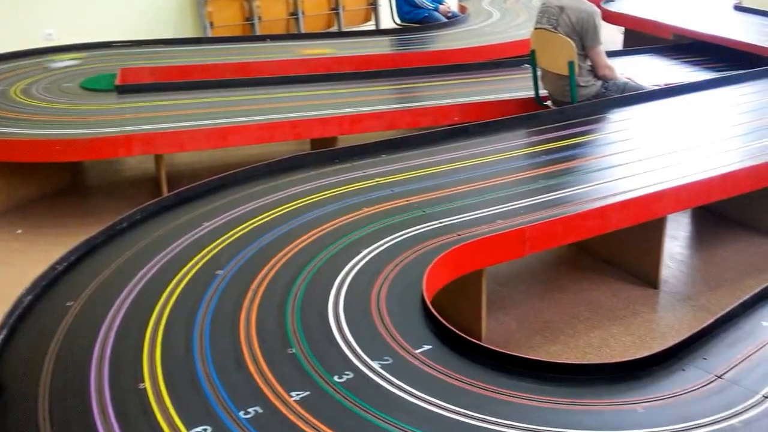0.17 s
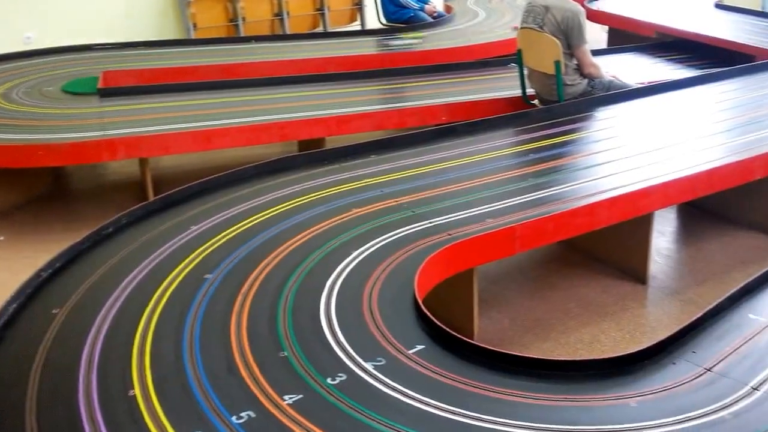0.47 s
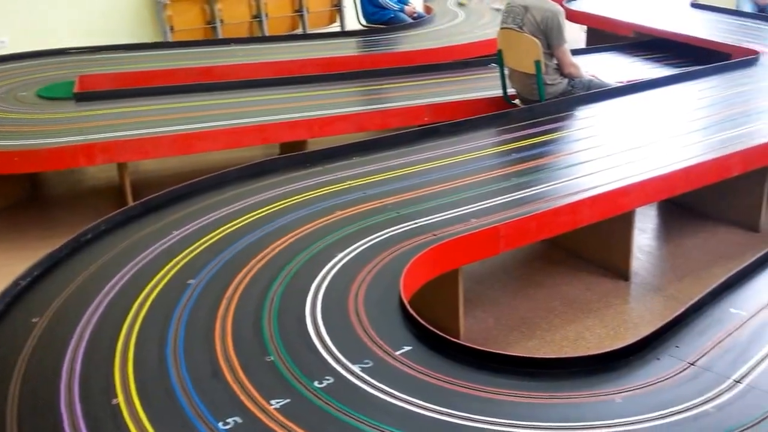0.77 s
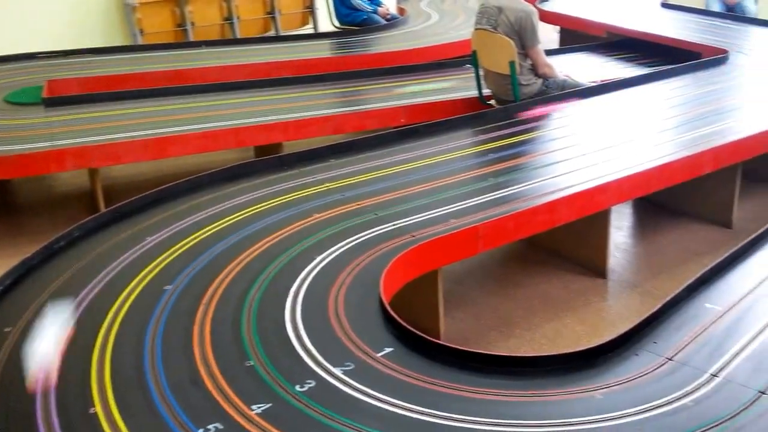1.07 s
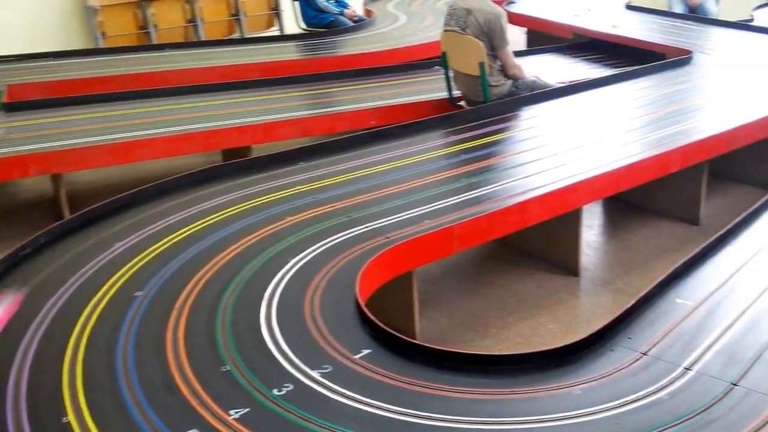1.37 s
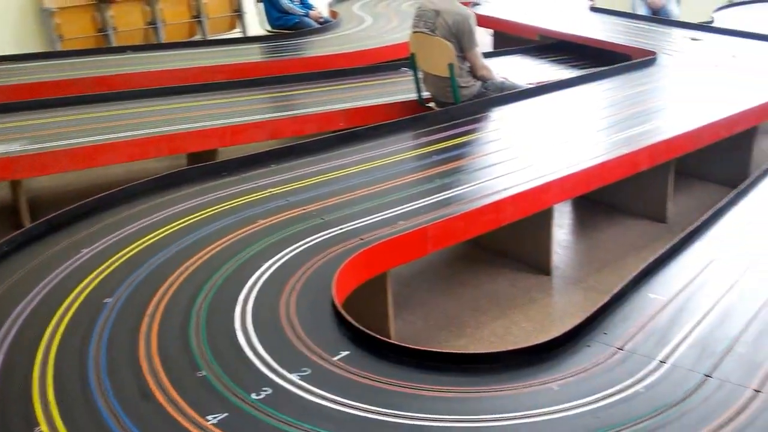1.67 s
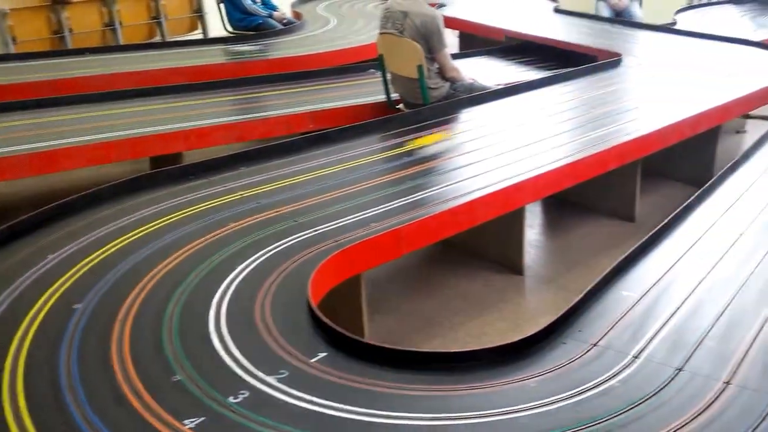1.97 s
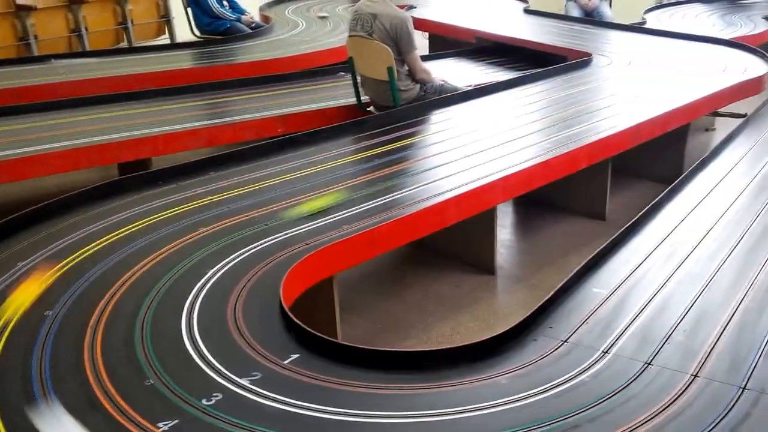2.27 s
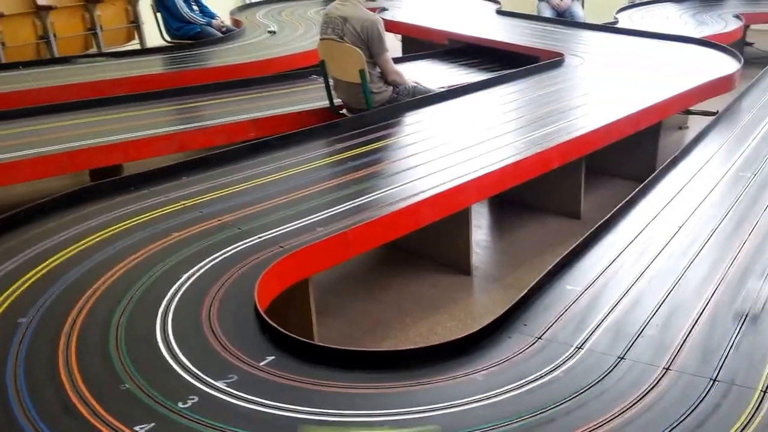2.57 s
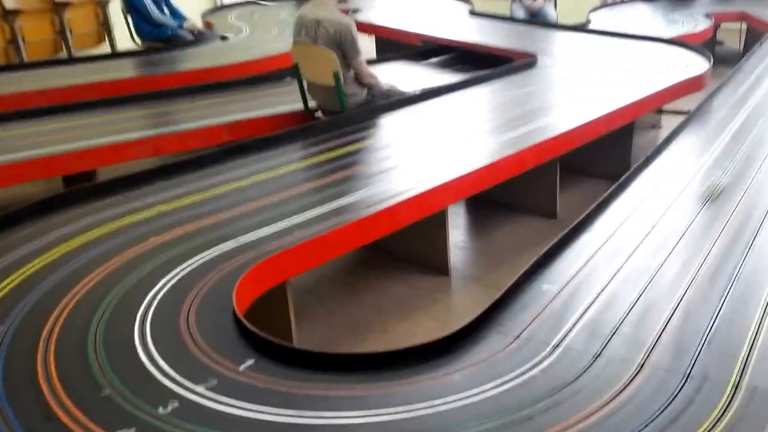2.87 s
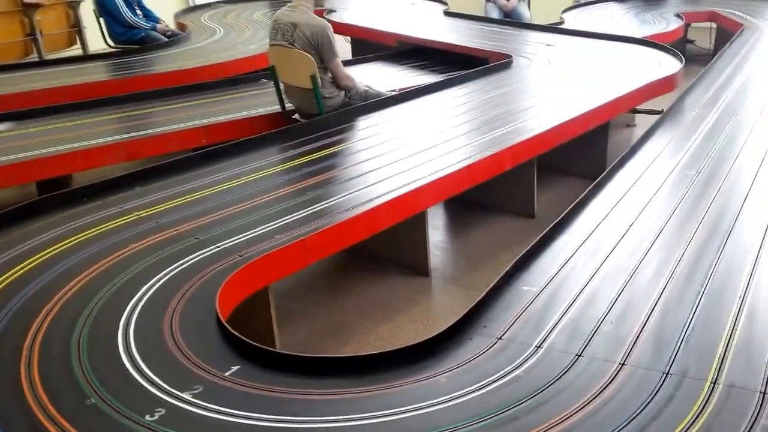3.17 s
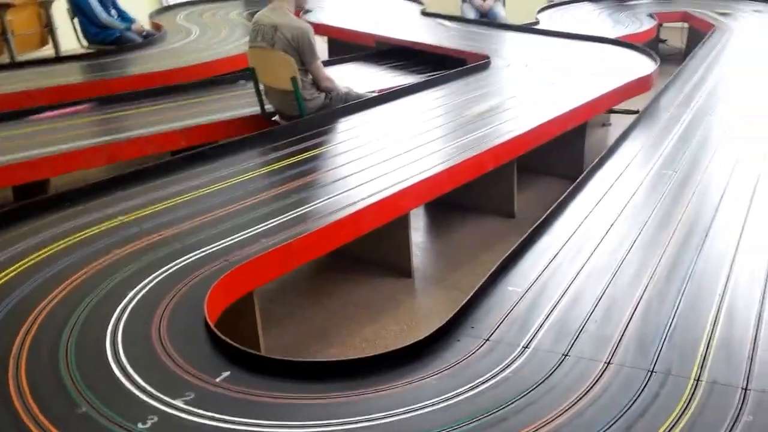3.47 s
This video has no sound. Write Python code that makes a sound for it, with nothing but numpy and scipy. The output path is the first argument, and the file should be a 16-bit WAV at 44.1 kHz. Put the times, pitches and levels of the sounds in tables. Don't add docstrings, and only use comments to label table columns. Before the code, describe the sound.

Small electric slot cars whine shrilly, braking and speeding up over steady rail hiss; one passes loudest just before two seconds, then several surge together and brake. Indoor hall with short echoes, stereo camera microphone nearby.

```python
import sys
import numpy as np
from scipy import signal
from scipy.io import wavfile
from scipy.ndimage import uniform_filter1d

SR = 44100
rng = np.random.default_rng(int(sys.argv[2]) if len(sys.argv) > 2 else 0)


def unload_wav(signal):
    wavfile.write(
        sys.argv[1],
        SR,
        np.round(np.clip(np.atleast_2d(signal).T, -1, 1) * 32767).astype(np.int16),
    )


def convert_level_to_amplitude(level_db):
    exponent = np.asarray(level_db, float) / 20
    return 10 ** exponent


N = 160083


def evened(x):
    return x / np.sqrt(np.mean(x ** 2) + 1e-20)


def read(points, hz):
    f, value = np.transpose(points)
    return np.interp(np.log(hz + 1), np.log(f + 1), value)


def over_time(points):
    return convert_level_to_amplitude(np.interp(np.arange(N) / SR, *np.transpose(points)))


def wander(size, span_s):
    wide = max(round(span_s * SR), 1)
    once = uniform_filter1d(rng.standard_normal(size), wide)
    return evened(uniform_filter1d(once, wide))


# f/Hz, lead [rad]
PORT_LEAD = [(2000, 0), (3200, -.2), (3900, -1.5), (4800, -2.4), (7800, -3.1)]
# f/Hz, level/dB
PORT_TILT = [(500, -.3), (1500, 1.5), (2900, -5), (3600, -6), (4400, 0), (7700, -5)]


def whine(hz, level_db, facing, overtone_db):
    wobbly_hz = hz * (1 + .004 * wander(len(hz), 0.00582))
    turns = np.cumsum(wobbly_hz) / SR + rng.random()
    shrill_loss_db = 7 * np.maximum(2 * hz - 6900, 0) / 1000
    brush_db = -24 - np.maximum(hz - 3600, 0) / 50
    out = np.zeros((2, len(hz)))
    for order, db in ((1, 0), (2, overtone_db - shrill_loss_db), (1 / 3, brush_db)):
        flutter_db = 1.7 * wander(len(hz), 0.018)
        grit = 1 + convert_level_to_amplitude(-13) * wander(len(hz), .0008)
        size = np.sqrt(2) * convert_level_to_amplitude(level_db + db + flutter_db) * grit
        angle = 2 * np.pi * order * turns
        tilt = convert_level_to_amplitude(read(PORT_TILT, order * hz) * 0.36)
        left = np.cos(angle + facing * read(PORT_LEAD, order * hz)) * tilt
        right = np.cos(angle) / tilt
        out += size * np.array([left, right])
    return out


# t/s, gear f/Hz, level/dB
A_BRAKES = [(0, 5270, -26), (.04, 5050, -27), (.08, 4700, -24), (.12, 4200, -25), (.155, 3800, -32)]
A_CRAWLS = [(.12, 2200, -44), (.16, 2320, -42), (.2, 2450, -46), (.25, 2600, -42), (.29, 2830, -44)]
A_SPEEDS_UP = [(.29, 2925, -29), (.33, 3150, -32), (.36, 3500, -38), (.39, 3850, -34), (.41, 4100, -28),
               (.44, 4370, -33), (.48, 4600, -41)]
B_SPEEDS_UP = [(.015, 4080, -32), (.05, 4330, -26), (.08, 4700, -23), (.11, 5000, -28), (.14, 5150, -36)]
B_BRAKES = [(.17, 5550, -35), (.22, 5400, -33), (.25, 5200, -27), (.29, 4800, -33), (.33, 4300, -33),
            (.36, 3950, -34), (.41, 3450, -44)]
C_CRUISES = [(.19, 3050, -39), (.24, 2900, -39), (.3, 2980, -41), (.35, 3100, -40), (.4, 3020, -40),
             (.5, 3120, -39), (.55, 3220, -44)]
N_BRAKES = [(.56, 4200, -38), (.6, 4250, -35), (.66, 4420, -39), (.72, 4700, -39), (.76, 4000, -46),
            (.8, 3600, -43), (.85, 3720, -39), (.9, 3650, -41)]
O_CRAWLS = [(.78, 2480, -44), (.82, 2600, -43), (.87, 2750, -44), (.92, 2720, -44)]
K_SPEEDS_UP = [(.91, 3800, -40), (.93, 4100, -33), (.96, 4600, -35), (1.0, 4850, -33), (1.04, 4980, -37)]
E_CRAWLS = [(1.04, 2350, -45), (1.08, 2480, -46), (1.13, 2850, -41), (1.18, 3000, -50), (1.21, 3400, -45)]
D_SPEEDS_UP = [(1.02, 3850, -42), (1.09, 4120, -43), (1.15, 4280, -33), (1.18, 4400, -38),
               (1.21, 4560, -26)]
E_NEARS = [(1.21, 3500, -40), (1.26, 4000, -36), (1.3, 4280, -36), (1.42, 4020, -42), (1.55, 4050, -36),
           (1.63, 4080, -27), (1.68, 4157, -24), (1.76, 4285, -31)]
E_PASSES_CLOSE = [(1.76, 4300, -26), (1.8, 4440, -25), (1.845, 4670, -14), (1.88, 4680, -22),
                  (1.93, 4770, -13), (1.975, 4850, -16), (2.0, 4760, -21), (2.07, 4960, -22),
                  (2.16, 5220, -32)]
E_SURGES_AND_BRAKES = [(2.13, 2350, -40), (2.18, 2700, -42), (2.22, 3550, -36), (2.25, 4350, -30),
                       (2.28, 5080, -31), (2.3, 5100, -33), (2.335, 4820, -29), (2.38, 4050, -32),
                       (2.43, 3500, -40)]
F_CRUISES = [(1.22, 3760, -36), (1.3, 3780, -34), (1.42, 3720, -35), (1.47, 3650, -30), (1.53, 3580, -26),
             (1.59, 3690, -28), (1.63, 4300, -25)]
F_SPEEDS_UP = [(1.63, 4380, -21), (1.67, 4560, -16), (1.7, 4700, -18), (1.74, 4900, -20), (1.77, 5000, -36),
               (1.84, 5220, -31), (1.92, 5400, -36)]
G_SURGES_AND_BRAKES = [(1.8, 3004, -40), (1.93, 3110, -38), (2.0, 2850, -40), (2.04, 2800, -41),
                       (2.09, 3550, -38), (2.14, 4600, -34), (2.17, 4750, -31), (2.25, 4350, -34),
                       (2.31, 3600, -40)]
H_SLOWS_AND_NEARS = [(2.075, 4330, -34), (2.11, 4000, -33), (2.15, 3650, -38), (2.19, 3500, -37),
                     (2.3, 3370, -41), (2.42, 3110, -37), (2.55, 3200, -38), (2.7, 3440, -29),
                     (2.75, 3420, -30), (2.8, 3320, -29)]
H_SURGES_AND_BRAKES = [(2.8, 3320, -29), (2.87, 3560, -32), (2.92, 3830, -27), (2.96, 4190, -20),
                       (3.0, 4550, -25), (3.06, 4910, -25), (3.15, 5150, -38), (3.2, 4800, -31),
                       (3.28, 3700, -34), (3.31, 3300, -46)]
M_RUNS_FAST = [(2.33, 5250, -38), (2.42, 5220, -31), (2.5, 5290, -32), (2.56, 5470, -31), (2.6, 5450, -37)]
I_NEARS = [(2.399, 2537, -59), (2.55, 2925.0, -39.5), (2.7, 3050, -32.5), (2.801, 3030, -40.5),
           (2.86, 2930, -31), (2.929, 3064, -29.5)]
I_SURGES_AND_BRAKES = [(2.93, 2985, -24), (2.97, 3344, -29), (3.02, 4317, -20), (3.06, 4900, -27),
                       (3.12, 5400, -31), (3.2, 5800, -28), (3.25, 5300, -33), (3.32, 4330, -28),
                       (3.4, 3300, -39), (3.49, 2150, -46)]
J_NEARS = [(2.5, 2350, -46), (2.6, 2560, -45), (2.67, 2780, -39), (2.72, 2750, -42), (2.76, 2860, -39),
           (2.85, 2880, -45), (2.91, 3000, -40), (2.96, 2790, -32)]
J_SURGES_AND_BRAKES = [(2.96, 2800, -28), (2.99, 2877, -30), (3.03, 3927, -26), (3.065, 4400, -19),
                       (3.12, 4800, -29), (3.25, 5640, -24), (3.29, 5250, -27), (3.34, 4500, -28),
                       (3.39, 3800, -35), (3.48, 2600, -43)]
P_RUNS_FAST = [(3.44, 4720, -36), (3.47, 4760, -30), (3.53, 4750, -34), (3.57, 4750, -39),
               (3.63, 4920, -29)]
L_SPEEDS_UP = [(3.49, 2150, -46), (3.55, 2650, -41), (3.6, 3500, -39), (3.63, 3780, -37)]
STRETCHES = [
    A_BRAKES, A_CRAWLS, A_SPEEDS_UP, B_SPEEDS_UP, B_BRAKES, C_CRUISES,
    E_NEARS, E_PASSES_CLOSE, E_SURGES_AND_BRAKES, F_CRUISES, F_SPEEDS_UP,
    G_SURGES_AND_BRAKES[4:], G_SURGES_AND_BRAKES[:5],
    H_SLOWS_AND_NEARS[:6], H_SURGES_AND_BRAKES, H_SLOWS_AND_NEARS[5:],
    I_NEARS, J_NEARS, I_SURGES_AND_BRAKES, J_SURGES_AND_BRAKES,
    K_SPEEDS_UP, E_CRAWLS, L_SPEEDS_UP, D_SPEEDS_UP, M_RUNS_FAST, N_BRAKES, O_CRAWLS, P_RUNS_FAST]
OVERTONE_DB = [-12, 14, -8, -14, -2, 5, -5, -20, -3, -4, -20, -20, 3, -4, -10, -4, -14, 8, -14, -8, -20, 11,
               -20, -20, -18, 1, 6, -15]
FACING = [.8, .9, .6, .8, .5, .9, .5, .9, .3, .7, .9, .5, .6, 0, .2, -.4, .5, .2, .6, .5, .6, .6, .5, .6,
          .4, .6, .6, .6]


def near_cars():
    edge_s = .012
    out = np.zeros((2, N))
    for stretch, overtone_db, facing in zip(STRETCHES, OVERTONE_DB, FACING):
        s, hz, db = np.transpose(stretch)
        first, last = s[0] - edge_s, s[-1] + edge_s
        at = np.arange(max(round(first * SR), 0), min(round(last * SR), N))
        t = at / SR
        smooth_hz = uniform_filter1d(np.interp(t, s, hz), size=300)
        smooth_db = uniform_filter1d(np.interp(t, s, db), size=300)
        since_start = t - first + (s[0] < .01)
        fade = np.clip(np.minimum(since_start, last - t) / (2 * edge_s), 0, 1)
        out[:, at] += np.sqrt(fade) * whine(smooth_hz, smooth_db, facing, overtone_db)
    return out


# t/s, level/dB
PACK = [(0, -23.5), (0.351, -25), (.75, -26.5), (1.0, -26.5), (1.35, -23.5), (1.9, -24), (2.399, -23.5),
        (2.8, -23.5), (3.151, -25.5), (3.63, -26)]
# f/Hz, level/dB
HISS = [(900, -26), (1600, -20.5), (2200, -13.5), (3000, -11.5), (4700, -1), (6000, -4.5), (7600, -13.5),
        (8400, -30.5)]


def far_cars(pack, count=8):
    out = np.zeros((2, N))
    for middle_hz in np.geomspace(2800, 6200, count):
        hz = middle_hz * np.exp(.2 * np.tanh(wander(N, .2)))
        level_db = -42 + read(HISS, hz) + 1.4 * wander(N, 0.047)
        out += whine(hz, level_db, rng.uniform(0.74, 1), -12.5)
    return out * pack / np.mean(pack)


def hall(x):
    t = np.arange(SR // 2) / SR
    signs = rng.choice([-1., 1.], (2, len(t)))
    present = rng.random((2, len(t))) < .05
    decay = convert_level_to_amplitude(-60 * t / .35) * (t > .004)
    taps = signs * present * decay
    return signal.fftconvolve(x, taps / np.linalg.norm(taps[0]), axes=1)[:, :N]


# f/Hz, likeness [0 to 1]
PORT_LIKENESS = [(100, .995), (300, .975), (600, .93), (1400, .8), (2800, .6), (4500, .45), (7700, .85)]


def wash(spectrum, patchy_db):
    hz = np.fft.rfftfreq(2048, 1 / SR)
    frames = N // 512 + 5
    a, b, c, d, patch = rng.standard_normal((frames, len(hz), 5)).T
    patch = uniform_filter1d(patch, size=24, axis=0)
    patch = evened(uniform_filter1d(patch, size=8, axis=1))
    same = np.clip(read(PORT_LIKENESS, hz), 0, 1)[:, None]
    left = a + 1j * b
    right = same * left + np.sqrt(1 - same ** 2) * (c + 1j * d)
    tilt = convert_level_to_amplitude(read(PORT_TILT, hz) / 2)[:, None]
    lead = np.exp(1j * read(PORT_LEAD, hz))[:, None]
    z = np.array([left * tilt * lead, right / tilt])
    inside = (hz >= spectrum[0][0]) & (hz <= spectrum[-1][0])
    z *= convert_level_to_amplitude(read(spectrum, hz)[:, None] + patchy_db * patch) * inside[:, None]
    return evened(signal.istft(z, nperseg=2048, noverlap=1536)[1][:, :N])


def rail_hiss(pack):
    return pack * wash(HISS, 1.68)


# t/s, level/dB
DECK = [(0, -41), (.15, -43), (.32, -39), (.5, -42.5), (1.0, -43), (1.5, -40), (1.9, -42.5), (2.2, -42),
        (2.5, -40.5), (2.75, -38), (3.1, -43), (3.63, -41.5)]
# f/Hz, level/dB
RUMBLE = [(25, -47.5), (45, -31), (70, -4), (145, -1), (190, -5.5), (300, -10.5), (500, -19.5), (900, -22)]


def deck_rumble():
    return convert_level_to_amplitude(0.37) * over_time(DECK) * wash(RUMBLE, 1.3)


# f/Hz, level/dB
HUM = [
    (374.6, -44.5),
    (749.3, -61),
]


def supply_hum():
    t = np.arange(N) / SR
    out = np.zeros(N)
    for hz, db in HUM:
        size = np.sqrt(2) * convert_level_to_amplitude(db + 1.6 * wander(N, 0.2))
        drift = .5 * hz / 375 * wander(N, 0.089)
        out += size * np.sin(2 * np.pi * hz * t + drift)
    return out


# t/s, level/dB, f/Hz
KNOCKS = [
    (1.477, -25, 2050),
    (1.502, -24, 1850),
]


def joint_knocks():
    out, t = np.zeros(N), np.arange(0, .03, 1 / SR)
    for s, db, hz in KNOCKS:
        decay = convert_level_to_amplitude(db - 60 * t / 0.046)
        onset = np.minimum(t / 0.009, 1)
        rough = 1 + 0.7 * wander(len(t), 0.0009)
        out[round(s * SR):][:len(t)] += decay * onset * np.sin(2 * np.pi * hz * t) * rough
    return out


def scene():
    pack = over_time(PACK)
    cars = near_cars() + far_cars(pack) + joint_knocks()
    echoes = convert_level_to_amplitude(-8.5) * hall(cars)
    return cars + echoes + rail_hiss(pack) + deck_rumble() + supply_hum()


def band_limit(x):
    return signal.sosfilt(signal.butter(12, 8300, fs=SR, output="sos"), x)


def record(dry):
    dulled = signal.sosfilt(signal.butter(8, 8150, fs=SR, output="sos"), dry)
    mix = dulled + 0.0015
    return band_limit(mix)


dry = scene()
out = record(dry)
unload_wav(out)
```